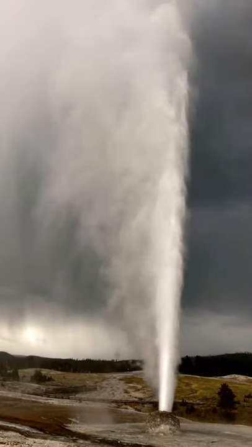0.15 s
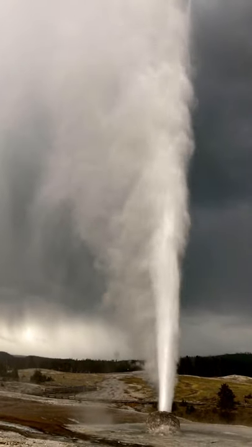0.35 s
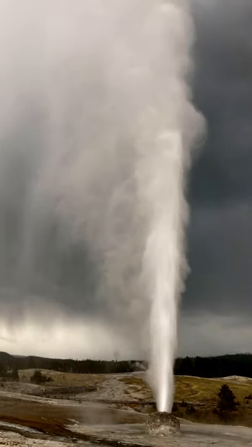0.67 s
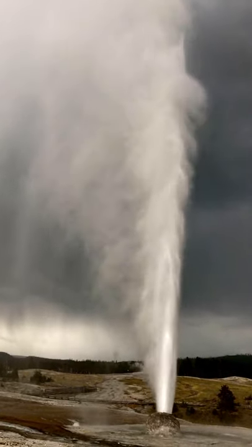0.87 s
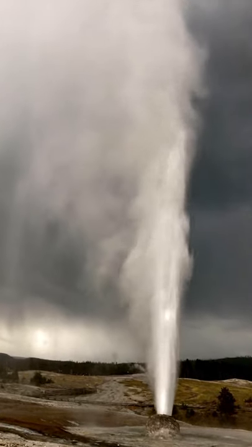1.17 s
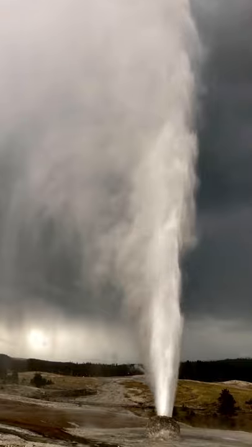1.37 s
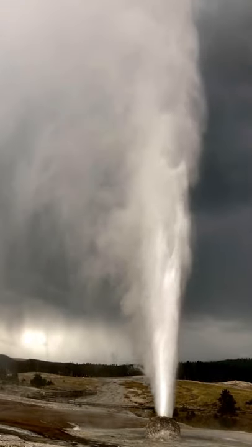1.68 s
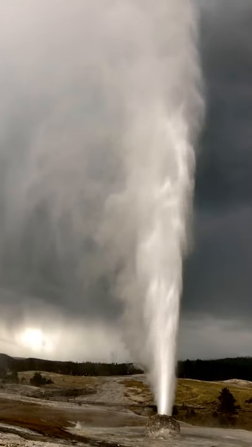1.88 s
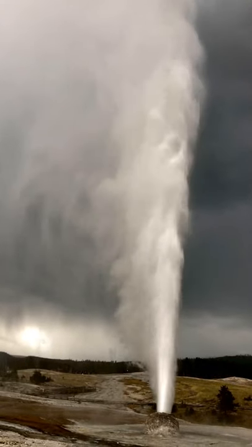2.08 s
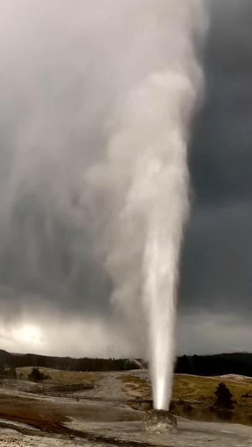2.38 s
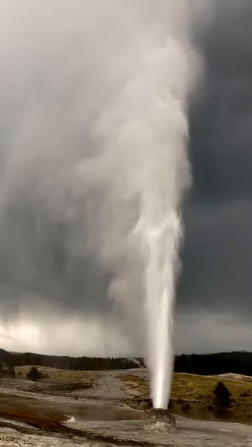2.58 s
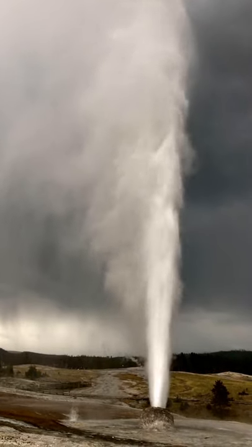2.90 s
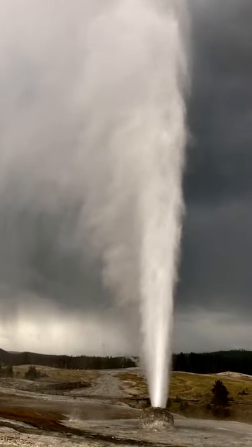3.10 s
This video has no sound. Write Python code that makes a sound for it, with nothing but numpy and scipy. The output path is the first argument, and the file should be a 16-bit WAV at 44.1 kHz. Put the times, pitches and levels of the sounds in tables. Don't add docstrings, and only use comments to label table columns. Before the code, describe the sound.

Geyser jet of water and steam, continuous from start to end; low, wind-like buffeting rumble is strongest early, then eases and returns in waves, while roar and bright hiss continue above. Outdoors, no echo, distant microphone.

```python
import sys
import numpy as np
from scipy import signal
from scipy.fft import rfft, irfft
from scipy.io import wavfile

SR = 44100
rng = np.random.default_rng(int(sys.argv[2]) if len(sys.argv) > 2 else 0)


def level_to_linear(level):
    exponent = np.asarray(level, float) / 20
    return 10 ** exponent


def pcm_store(signal):
    levels = np.round(np.clip(np.atleast_2d(signal), -1, 1) * 32767)
    wavfile.write(sys.argv[1], SR, levels.astype(np.int16).T)


N = 143325
RUN_IN = 8000


def rms_one(x):
    return x / np.sqrt(np.mean(x ** 2) + 1e-20)


def bandpass(x, order, low_hz, high_hz):
    return signal.sosfilt(signal.butter(order, [low_hz, high_hz], "band", fs=SR, output="sos"), x)


def white():
    return rng.standard_normal((2, N + RUN_IN))


def at_hz(points, hz):
    points_hz, points_db = np.transpose(points)
    return np.interp(np.log(hz), np.log(points_hz), points_db)


def drift(rate_hz):
    hop = 40
    pole = np.exp(-2 * np.pi * rate_hz * hop / SR)
    noise = rng.standard_normal(N // hop + 2002)
    slow = rms_one(signal.lfilter([1], [1, -2 * pole, pole * pole], noise)[2000:])
    return np.interp(np.arange(N) / hop, np.arange(len(slow)), slow)


def turbulence(source, spectrum, shared_db, own_db, rate_hz, tilt_db=0):
    out = 0
    together = drift(rate_hz)
    edges_hz = 25 * 2 ** np.arange(0, 9.5, 1 / 3)
    for k, (low_hz, high_hz) in enumerate(zip(edges_hz, edges_hz[1:])):
        centre_hz = np.sqrt(low_hz * high_hz)
        band = bandpass(source[k % 2], 2, low_hz, high_hz)[RUN_IN:]
        flicker_db = shared_db * together + own_db * drift(rate_hz)
        brightness_db = tilt_db * np.log2(centre_hz / 4000)
        out = out + band * level_to_linear(at_hz(spectrum, centre_hz) + flicker_db + brightness_db)
    return rms_one(out)


def rumble(vent_db):
    # hz, density_db (dB per Hz)
    rumble_spectrum = [(18, -46), (30, -12), (59, 0.5), (91, 0.5), (167, -6.5), (274, -16), (331, -22),
                       (419, -28), (500, -26), (650, -54), (1100, -120)]
    return level_to_linear(vent_db) * turbulence(white(), rumble_spectrum, 0.76, 0.98, 9.7)


def slugs():
    # start_s, peak_db, pitch_hz
    slug_table = [(0.177, -17, 80.7), (0.239, -11, 111), (0.279, -17, 80.7), (0.399, -17, 95),
                  (0.679, -19, 87), (1.129, -18, 80), (1.243, -17, 131), (1.521, -20.5, 101),
                  (1.713, -22, 80.7), (1.775, -15.5, 158), (1.859, -15.5, 87), (1.929, -19, 82),
                  (2.109, -18, 91.5), (2.35, -24, 106), (2.539, -26.5, 91), (2.879, -19.5, 80.7),
                  (3.032, -17, 80.7), (3.078, -16.5, 80.7)]
    rise_s, fall_s = 0.0072, 0.026
    puff_db, skirt_db = -9.5, -14.5
    out = np.zeros(N + SR)
    t = np.arange(SR // 4) / SR
    shape = (1 - np.exp(-t / rise_s)) ** 2 * np.exp(-t / fall_s)
    shape = shape / shape.max()
    for start_s, peak_db, pitch_hz in slug_table:
        noise = rng.standard_normal(len(t))
        body = rms_one(bandpass(noise, 2, pitch_hz / 1.63, pitch_hz * 1.79))
        skirt = rms_one(bandpass(noise, 1, 300, 1200))
        puff = shape * (body + level_to_linear(skirt_db) * skirt)
        i = int(start_s * SR)
        out[i:i + len(t)] += level_to_linear(peak_db + puff_db) * puff
    return out[:N]


def roar(jet_db):
    # hz, density_db (dB per Hz)
    roar_spectrum = [(150, -24), (300, 2.5), (500, 2.5), (1000, -2), (2000, -10.5), (4000, -20.5)]
    return level_to_linear(jet_db - 2.5) * turbulence(white(), roar_spectrum, 1.5, 0.84, 8.8)


def spray(spray_db):
    # hz, density_db (dB per Hz)
    spray_spectrum = [(290, -31), (500, 0), (697, -7), (1830, -6), (2110, -8), (3610, -7), (5400, -9),
                      (11600, -15.5), (15700, -23.5)]
    drops_per_s, drops_db = 6000, -10.5
    size = (2, N + RUN_IN)
    struck = rng.random(size) < drops_per_s / SR
    strength = level_to_linear(3.2 * rng.exponential(1, size))
    drops = struck * strength * rng.choice([-1, 1], size)
    source = white() + level_to_linear(drops_db) * rms_one(drops)
    tilt_db = 0.23 * (spray_db - spray_db.mean())
    return level_to_linear(spray_db + 1.5) * turbulence(source, spray_spectrum, 0.3, 0.48, 10.5, tilt_db)


def splits(mono):
    # start_s, low_khz, high_khz
    split_table = [(.08, 6.2, 8.3), (.08, 10.3, 11.7), (.195, 13.1, 14.5), (.685, 12.4, 14.5),
                   (.87, 6.9, 8.3), (.985, 13.1, 14.5), (1.01, 11, 13.1), (1.01, 6.2, 7.6),
                   (1.195, 9, 10.3), (1.195, 5.2, 6.2), (1.335, 13.8, 15.2), (1.565, 14.5, 15.8),
                   (1.94, 11.7, 13.8), (2.1, 8.3, 9.6), (2.1, 4.7, 5.7), (2.47, 12.4, 13.8),
                   (2.75, 8.3, 9.6), (2.75, 6.2, 7.6), (3.1, 12.4, 13.8), (3.19, 4.1, 5.2)]
    hop, offset = 1024, 416
    side = np.zeros(N + hop)
    bins_hz = np.fft.rfftfreq(2 * hop, 1 / SR)
    fade = np.kaiser(2 * hop, 4 * np.pi) ** 0.5
    for start_s, low_khz, high_khz in split_table:
        i = offset + hop * (round((start_s * SR - offset) / hop) - 1)
        in_band = (bins_hz > 1000 * low_khz) * (bins_hz < 1000 * high_khz)
        magnitude = np.abs(rfft(mono[i:i + 2 * hop], 2 * hop)) * in_band
        random_phase = np.exp(2j * np.pi * rng.random(len(bins_hz)))
        side[i:i + 2 * hop] += fade * irfft(magnitude * random_phase)
    return level_to_linear(-2) * side[:N] * [[1], [-1]]


def scene():
    # time_s, vent_db (rumble), jet_db (roar), spray_db
    surge_table = [(0.0, -28, -44.5, -42.5), (0.25, -15, -33.5, -41), (0.56, -30, -44, -42),
                   (0.71, -24.5, -40.5, -43), (0.76, -31.5, -41, -41.5), (0.89, -33.5, -47.5, -44.5),
                   (1.23, -27, -40, -43.5), (1.3, -32, -50, -43.5), (1.68, -27.5, -41.5, -41.5),
                   (1.79, -19.5, -37, -41), (1.99, -25.5, -35.5, -40), (2.1, -22.5, -38, -42),
                   (2.39, -27.5, -39, -40.5), (2.75, -32.5, -45, -43.5), (2.97, -21, -39, -41),
                   (3.03, -24.5, -32, -42), (3.07, -20, -36.5, -40.5), (3.25, -28, -40.5, -41.5)]
    time_s, *columns = np.transpose(surge_table)
    vent_db, jet_db, spray_db = [np.interp(np.arange(N) / SR, time_s, c) for c in columns]
    mono = rumble(vent_db) + slugs() + roar(jet_db) + spray(spray_db)
    return np.array([mono, mono])


def roll_off(x):
    return signal.sosfilt(signal.butter(12, 15750, fs=SR, output="sos"), x)


def record(dry):
    cut = signal.sosfilt(signal.butter(6, 45.5, "high", fs=SR, output="sos"), dry)
    mix = cut + splits(cut[0])
    return roll_off(mix)


dry = scene()
out = record(dry)
pcm_store(out)
```